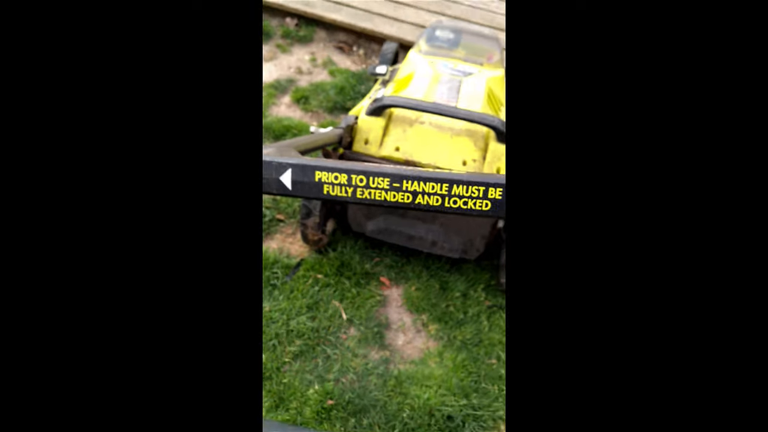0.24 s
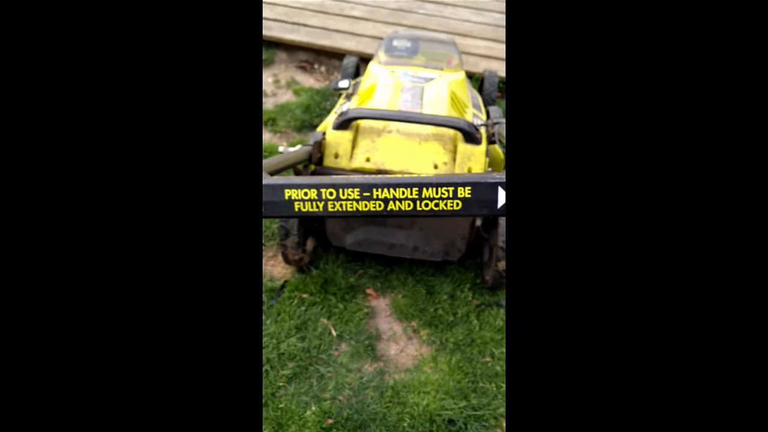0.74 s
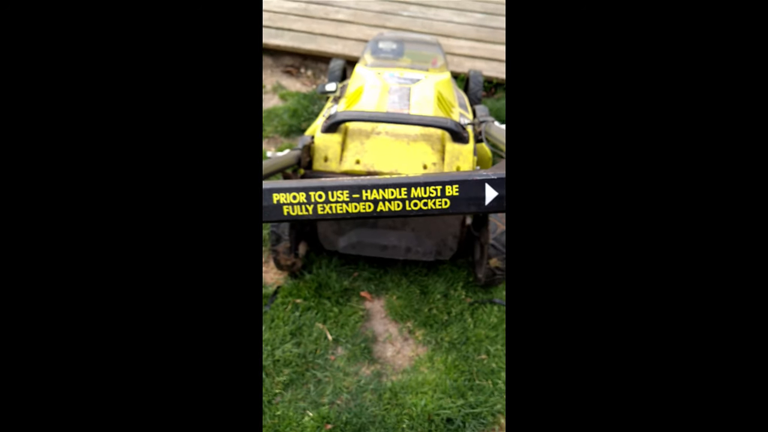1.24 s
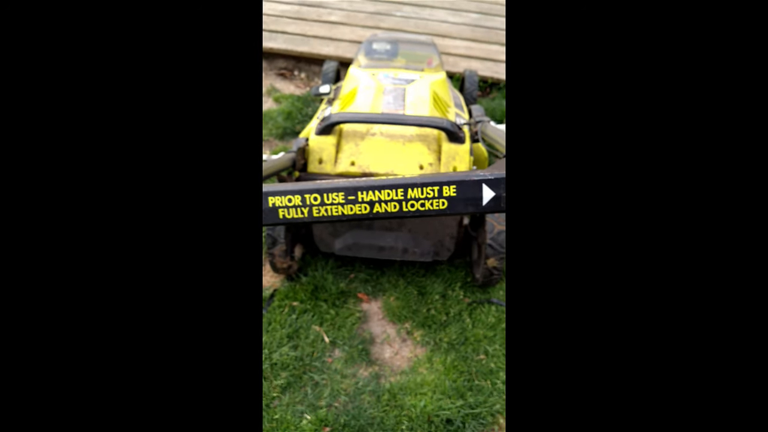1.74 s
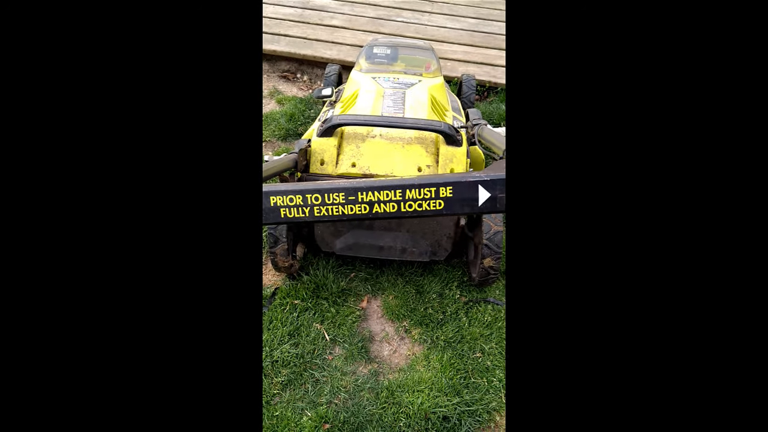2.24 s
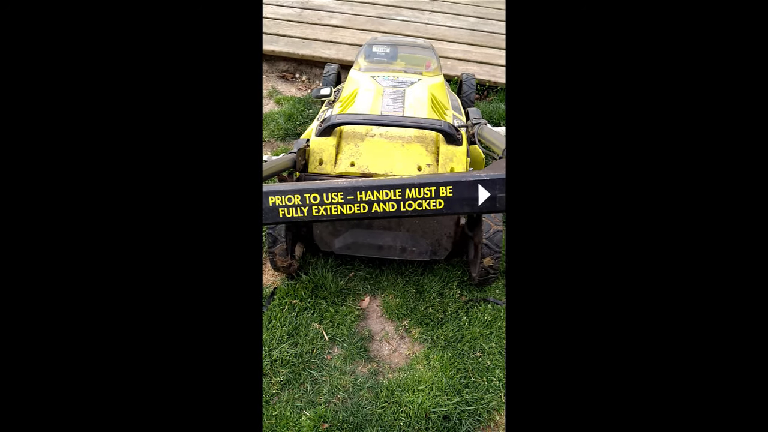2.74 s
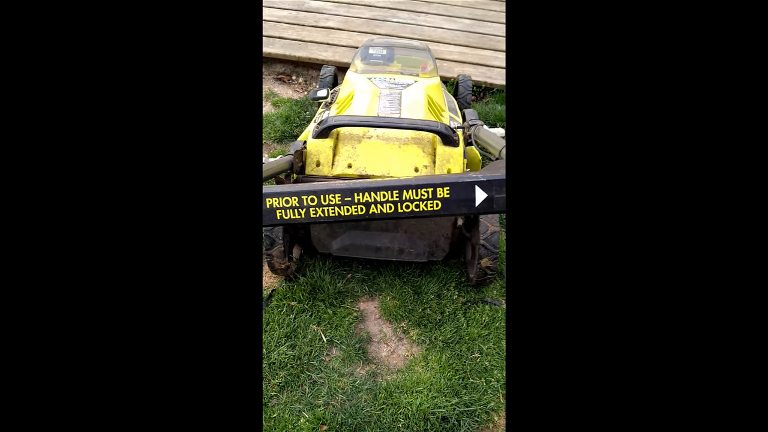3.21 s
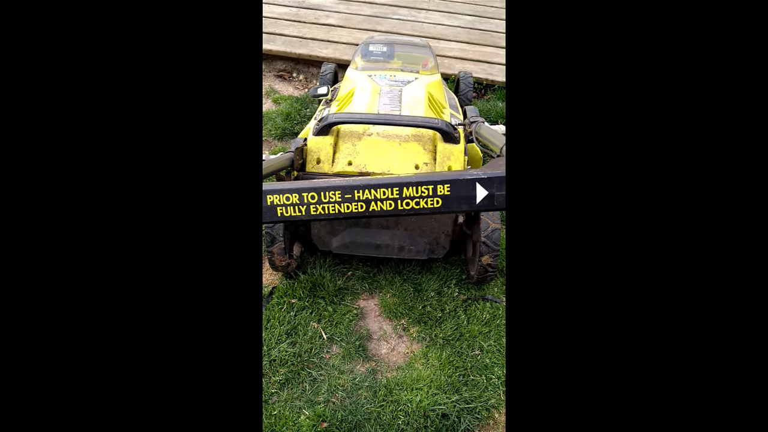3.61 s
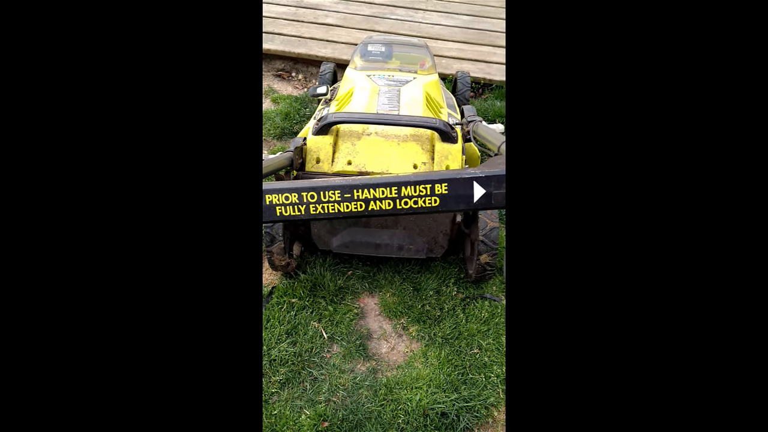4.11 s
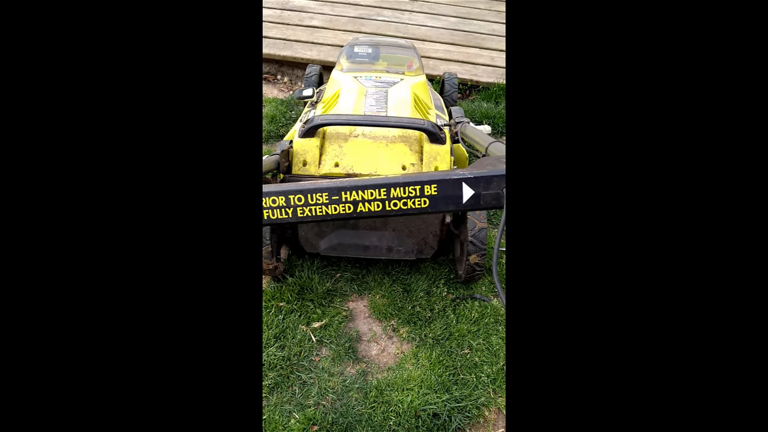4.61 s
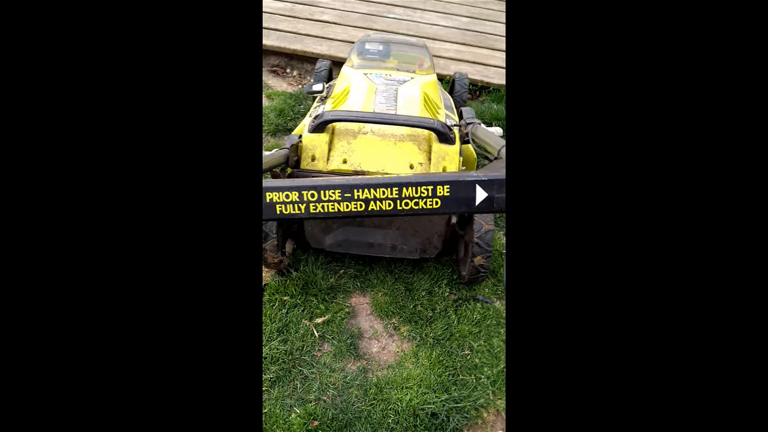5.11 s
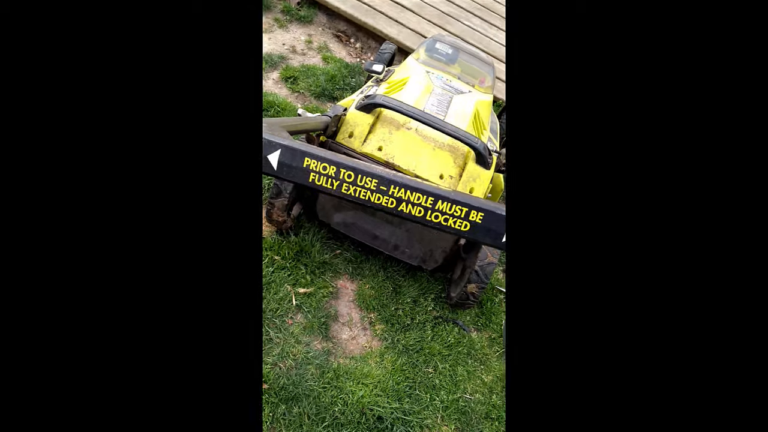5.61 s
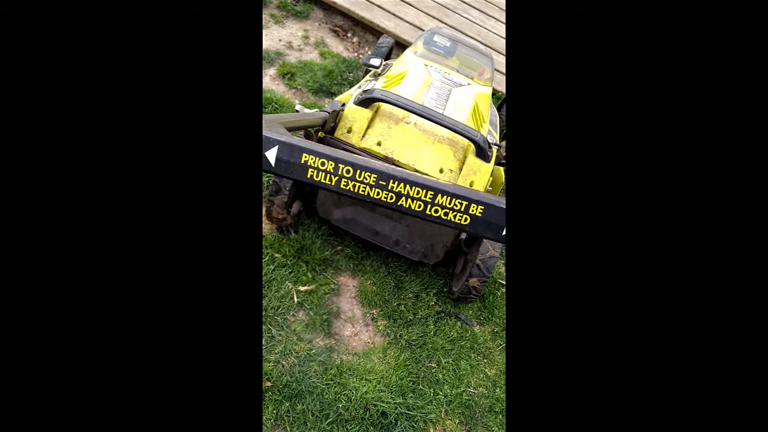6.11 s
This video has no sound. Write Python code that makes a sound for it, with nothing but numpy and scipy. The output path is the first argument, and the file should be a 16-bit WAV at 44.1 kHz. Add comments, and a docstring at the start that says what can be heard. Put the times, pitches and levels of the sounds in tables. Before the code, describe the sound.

Outdoors, a battery mower is already running as the sound begins, its pitch rising quickly and easing back to a constant speed. The spinning blade gives a buzzing low hum and beats the rushing air into fast gusts, with a hollow midrange roar and softer hiss above. Small irregular bursts and tiny clicks break the surface. Close stereo phone pickup, dry, slightly darker in the last second.

```python
"""A battery lawn mower on grass, heard from the handle on a phone.
At first the motor gains its last bit of speed, overshoots a little and settles, while the phone leans off.
All along, the two-tipped blade hums and chops the rushing air into gusts, which the deck makes roar near 1 kHz.
Now and then the turbulent roar peaks in a short, strong pulse or the plastic housing ticks.
Near the end the phone leans again and the treble dulls."""
import sys
import numpy as np
from scipy import signal
from scipy.fft import rfft, irfft
from scipy.io import wavfile
from scipy.ndimage import uniform_filter1d

SR = 44100
rng = np.random.default_rng(int(sys.argv[2]) if len(sys.argv) > 2 else 0)


def log_audio(samples):
    """Write samples as a 16-bit WAV file to the path given in sys.argv[1]."""
    # one column per channel
    frames = np.atleast_2d(samples).T
    # limit to full scale, then quantise
    limited = np.clip(frames, -1, 1)
    pcm = np.round(limited * 32767).astype(np.int16)
    wavfile.write(sys.argv[1], SR, pcm)


N = 280035
TIME = np.arange(N) / SR
FREQS = np.maximum(np.fft.rfftfreq(N, 1 / SR), 1)


def undb(db):
    """Decibels to gain."""
    return 10 ** (np.asarray(db) / 20)


def curve(table, axis=1):
    """One column of a table, joined by straight lines in time."""
    rows = np.array(table)
    return np.interp(TIME, rows[:, 0], rows[:, axis])


def across(table, axis=1):
    """One column of a table, joined by straight lines in log frequency."""
    rows = np.array(table)
    return np.interp(np.log(FREQS), np.log(rows[:, 0]), rows[:, axis])


def walk(hz):
    """Smooth chance with a spread near 1: random steps, averaged twice to round them off."""
    k = int(SR / hz)
    steps = np.repeat(rng.standard_normal(N // k + 1), k)
    return 1.3 * uniform_filter1d(uniform_filter1d(steps, k), k)[:N]


CRUISE_HZ, SAG_HZ_PER_S = 42.66, 0.0115  # the speed sags with the battery
SPIN_UP_HZ, SPIN_UP_S = 3.88, .254
OVERSHOOT_HZ, SETTLE_S = 1.75, .776


def shaft_hz():
    """Turns per second: cruise speed, less what the spin-up still lacks, plus the governor's overshoot."""
    lacking = SPIN_UP_HZ * np.exp(-(TIME / SPIN_UP_S) ** 2)
    overshoot = OVERSHOOT_HZ * np.exp(-(TIME / SETTLE_S) ** 2)
    return CRUISE_HZ - SAG_HZ_PER_S * TIME - lacking + overshoot


# How the hum's two strongest lines rise and fall; only the change about each one's median counts.
# Each row: time in seconds, fourth order in dB, sixth order in dB.
LINE_LEVELS = [(0.06, -26.5, -28), (0.27, -26, -25), (0.58, -24, -26.5), (1.12, -27, -24), (1.61, -26, -24),
               (1.87, -26.5, -24.5), (5.85, -26.5, -25.5), (6.02, -23.5, -25), (6.3, -25, -25)]
STRONG_ORDERS = (4, 6)
HUM_SPEED_POWER = 4.3  # the other lines grow as this power of the shaft speed


def line_gain(order, speed):
    """Gain of one hum line: the two strongest have their own curves, the rest follow the speed."""
    if order not in STRONG_ORDERS:
        return speed ** HUM_SPEED_POWER
    db = curve(LINE_LEVELS, axis=1 + STRONG_ORDERS.index(order))
    return undb(db - np.median(db))


# Phase by which the right channel trails the left, for hum and air alike.
# Each row: frequency in Hz, phase lag in radians (below zero, the right channel leads).
RIGHT_LAG = [(45, -3), (140, -.3), (260, 0), (420, -.9), (520, -.15), (1050, -.05), (1550, .65),
             (2150, 3.14), (3200, 6.28), (4350, 9.4), (5050, 12.3), (5650, 12.8), (6300, 15.7),
             (7500, 18.5)]
# The lines of the blade hum: even orders come from the two tips, odd ones from their slightly uneven spacing.
# Each row: order (cycles per shaft turn), usual left level in dB rms, usual right level in dB rms.
HUM = [(1, -45, -51), (2, -29, -56), (3, -40, -41), (4, -24.5, -28.5), (5, -31.5, -39.5), (6, -21.5, -31),
       (7, -41, -37.5), (8, -27, -36.5), (9, -55, -54), (10, -28.5, -38.5), (11, -50, -49.5),
       (12, -37, -34), (13, -40.5, -43), (14, -42.5, -41), (16, -38, -44.5)]


def blade_hum(turns, speed, waver_db=0.22, high_waver_db=1.2, dispersion=0.0894, delay_turns=0.78):
    """Pressure pulses of the blade, smeared by the deck; the high orders waver most in the turbulence."""
    out = np.zeros((2, N))
    for order, left_db, right_db in HUM:
        order = round(order)
        # the deck shifts each order by its own phase, in radians
        angle = 2 * np.pi * order * (turns - delay_turns) + dispersion * order ** 2
        # the tips pass slightly unevenly in time, which puts the odd orders a quarter cycle off
        angle = angle + order % 2 * np.pi / 2
        waver = undb((waver_db + high_waver_db * (order / len(HUM)) ** 2) * walk(9))
        right_lag = np.interp(order * CRUISE_HZ, *np.transpose(RIGHT_LAG))
        line = np.cos(angle - np.array([[0], [right_lag]]))
        out += undb([[left_db], [right_db]]) * line_gain(order, speed) * waver * line
    return np.sqrt(2) * out  # rms to peak


def gusts(cycles, swing_db, scatter_db, peakedness):
    """Gain of the air flow: one gust a cycle, each of its own strength, with the mean power kept at 1."""
    angle = 2 * np.pi * cycles
    strength = np.interp(cycles + 1, np.arange(1000), rng.standard_normal(1000))
    shape = np.cos(angle) + peakedness * np.cos(2 * angle)
    gain = undb(swing_db * shape + scatter_db * strength)
    return gain / np.sqrt(np.mean(gain ** 2))


# The phone leans off to one side, which changes what reaches it.
# Each row: start in seconds, end in seconds, change of roar, of hiss and of top sizzle in dB.
LEANS = [(-.3, .9, 1.2, 0.1, .6), (5.2, 6.25, 0.54, -0.9, -3)]
LEAN_TAKES_S = .35
AIR_SPEED_POWER = 2.2  # the air's gain grows as this power of the shaft speed


def air_flows(speed, surge_db=0.2, surge_hz=4.02, rumble_db=1.5, rumble_hz=4.):
    """Gain of each register: all follow the speed, roar and rumble surge, leaning shifts roar, hiss and sizzle."""
    drive = speed ** AIR_SPEED_POWER
    lean_db = 0
    for start, end, *change_db in LEANS:
        leaning = np.clip(.5 + np.minimum(TIME - start, end - TIME) / LEAN_TAKES_S, 0, 1)
        lean_db = lean_db + np.outer(change_db, leaning)
    roar, hiss, sizzle = drive * undb(lean_db)
    roar = roar * undb(surge_db * walk(surge_hz))  # surges by chance
    rumble = drive * undb(rumble_db * walk(rumble_hz))
    return [rumble, drive, drive, roar, hiss, hiss, sizzle]  # low register to high


# Each register (band of pitch) of the rushing air swells at its own blade angle.
# Each row: centre in Hz, gusts per turn, delay in gust cycles, swing in dB,
# scatter from gust to gust in dB, peakedness from 0 to 1.
GUSTS = [(35, 1, 0.31, -1, 0.5, .1), (216, 2, 0.1, 3, 0.2, 0), (549, 2, 0.097, 4, 1.3, 0.1),
         (1109, 2, 0.2, 3, 0.66, 0.2), (2940, 2, 0.83, 3, 1.24, 0.54), (5480, 1, 0.29, 1.06, 1.6, .9),
         (8500, 2, 0.76, .5, 1, .3)]
# The broad colour of the rushing air, before the housing's peaks and hollows.
# Each row: frequency in Hz, left level in dB per Hz, right level in dB per Hz.
AIR = [(25, -70, -79.5), (91.5, -68, -62), (188, -53, -60.5), (404, -54.5, -54.5), (632, -54.5, -55),
       (831, -49.5, -51.5), (1064, -45, -46), (1200, -48, -48.5), (1574, -56.5, -61), (2070, -64, -66.5),
       (2840, -69.5, -72.5), (4300, -73.5, -75.5), (6230, -88, -87.5), (10370, -90.5, -102),
       (14400, -110, -115)]
# Peaks and hollows that the deck and housing add.
# Each row: frequency in Hz, width in Hz, height in dB.
HOUSING = [(954, 71, 2), (1033, 90, -0.5), (1202, 160, 2.14), (2180, 120, -1.5), (2430, 150, 6),
           (2610, 200, 0), (2910, 190, 5.5), (4500, 550, -7), (5040, 150, -4), (5410, 270, 4),
           (5950, 550, -2.5)]
# How much of the air both channels have in common.
# Each row: frequency in Hz, shared part of the power from 0 to 1.
SHARED = [(90, .2), (170, .75), (270, .5), (420, .8), (600, .93), (1050, .995), (1500, .92), (2150, .87),
          (3500, .76), (4700, .6), (5400, .92), (6400, .8), (8500, .25), (13000, .1)]


def rushing_air(turns, speed):
    """Turbulence chopped by the blade and coloured by the deck, partly shared by the two channels."""
    centres = np.log([row[0] for row in GUSTS])
    eddies = 0  # three spectra: heard in both channels, in the left alone, in the right alone
    # "own" is 1 at this register's centre and 0 at the others, so neighbours crossfade
    for (_, per_turn, delay, *shape), flow, own in zip(GUSTS, air_flows(speed), np.eye(len(GUSTS))):
        gate = flow * gusts(round(per_turn) * turns - delay, *shape)
        register = np.sqrt(np.interp(np.log(FREQS), centres, own))
        eddies = eddies + register * rfft(gate * rng.standard_normal((3, N)))
    housing_db = sum(db / (1 + (2 * (FREQS - hz) / width) ** 2) for hz, width, db in HOUSING)
    share = np.clip(across(SHARED), 0, 1)
    common = np.sqrt(share) * eddies[0]
    apart = np.sqrt(1 - share) * eddies[1:]
    lagging = common * np.exp(-1j * across(RIGHT_LAG))
    left = (common + apart[0]) * undb(across(AIR, axis=1))
    right = (lagging + apart[1]) * undb(across(AIR, axis=2))
    return irfft(np.array([left, right]) * undb(housing_db), N) * np.sqrt(SR / 2)


# Moments when the turbulent roar peaks in a short, strong pulse.
# Each row: start in seconds, peak of the pulse in dB.
ROAR_PEAKS = [(0.47, -4), (1.761, -5), (1.984, -5.5), (4.047, -5), (4.306, -5.5), (4.353, -3.5),
              (4.552, -5.5), (4.974, -7), (5.69, -3.5), (5.865, -3)]
PULSE_S = .0011  # from the pulse's peak to where it has faded to about a third


def add_roar_peaks(air, deck_hz=950, rise_s=0.00159):
    """The deck's roar briefly gathers into one suction pulse that rings for a couple of cycles."""
    roar = irfft(rfft(air) / (1 + (FREQS / (2 * deck_hz)) ** 8), N)  # the air without its treble
    out = air.copy()
    for start, db in ROAR_PEAKS:
        near = np.abs(TIME - start) < .02
        age = TIME[near] - start - rise_s
        gathered = np.exp(-(age / PULSE_S) ** 2)
        pulse = -undb(db) * np.cos(2 * np.pi * deck_hz * age)
        out[:, near] += gathered * (pulse - roar[:, near])  # the pulse takes the roar's place
    return out


# Small ticks of the plastic housing.
# Each row: start in seconds, level in dB before the colour and gain below.
TICKS = [(1.6028, -38), (1.6075, -37), (2.2394, -52), (3.913, -44), (4.5794, -51)]
# The bright colour of the ticks. Each row: frequency in Hz, gain in dB.
TICK_COLOUR = [(3000, -35), (6500, -10), (9000, 4), (12500, 0), (14500, -16)]


def ticks(decay_s=0.002, gain_db=7.0, right_db=-7.0):
    """Bright, dry clicks, louder on the left: noise that starts at once and dies away fast."""
    bursts = 0
    for start, db in TICKS:
        bursts = bursts + undb(db) * (TIME >= start) * np.exp(-np.abs(TIME - start) / decay_s)
    clicks = irfft(rfft(bursts * rng.standard_normal((2, N))) * undb(across(TICK_COLOUR)), N)
    return clicks * undb([[gain_db], [gain_db + right_db]])


START_TURNS = 0.0945  # blade angle at the start, in turns


def scene():
    """One shaft drives both the hum and the gusts."""
    hz = shaft_hz()
    turns = START_TURNS + np.cumsum(hz) / SR
    speed = hz / CRUISE_HZ
    return blade_hum(turns, speed) + add_roar_peaks(rushing_air(turns, speed)) + ticks()


TOP_HZ = 14000


def record(dry):
    """The phone drops the deepest rumble, below 18 Hz, and cuts the top."""
    thin = signal.sosfilt(signal.butter(2, 18, "high", fs=SR, output="sos"), dry)
    return signal.sosfilt(signal.ellip(8, .2, 70, TOP_HZ, fs=SR, output="sos"), thin)


dry = scene()
out = record(dry)
log_audio(out)
```